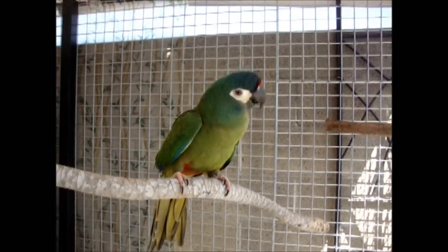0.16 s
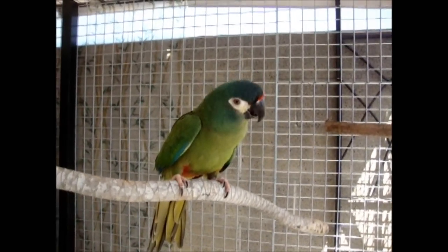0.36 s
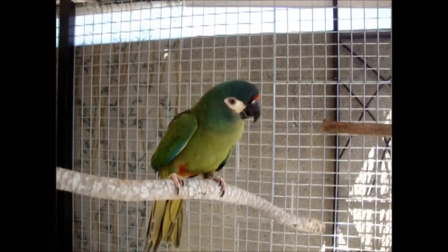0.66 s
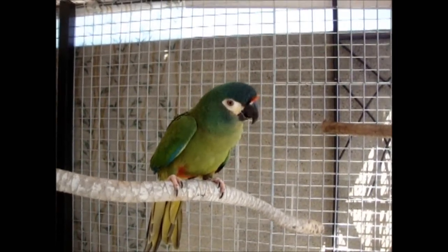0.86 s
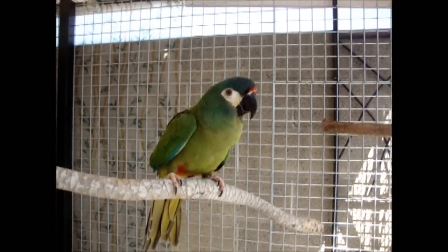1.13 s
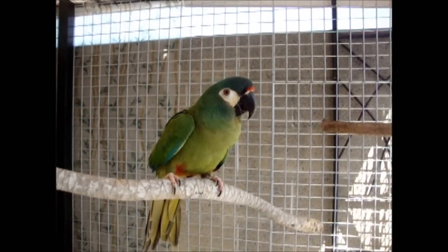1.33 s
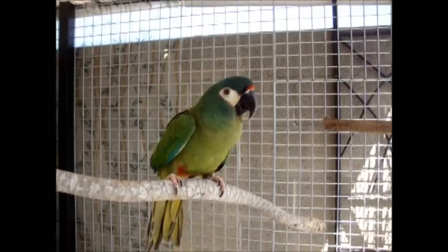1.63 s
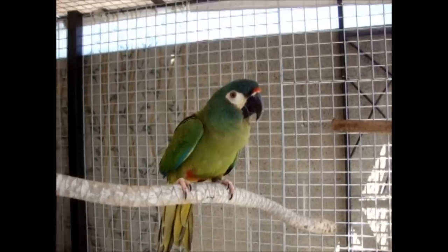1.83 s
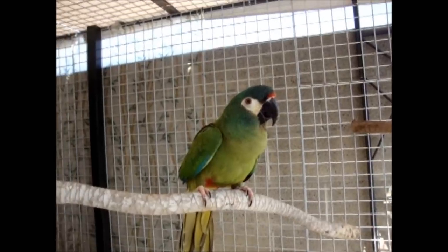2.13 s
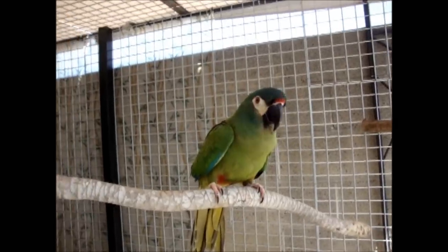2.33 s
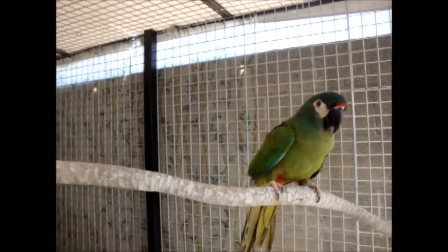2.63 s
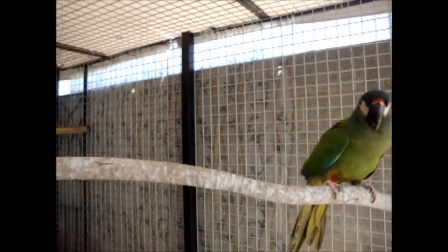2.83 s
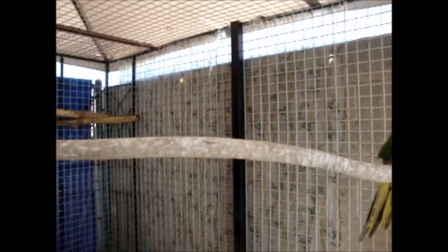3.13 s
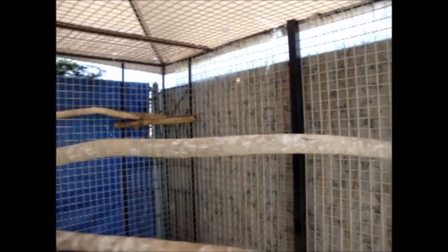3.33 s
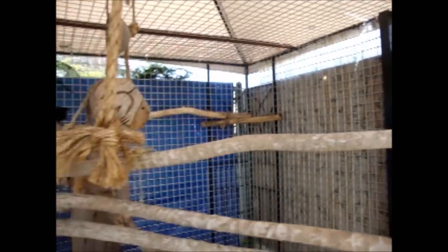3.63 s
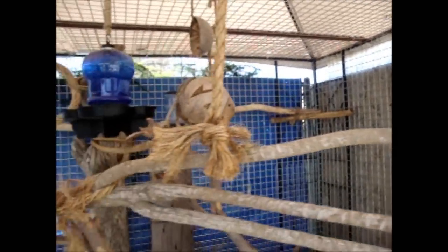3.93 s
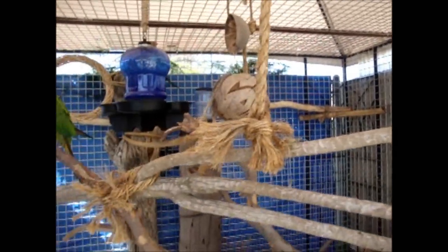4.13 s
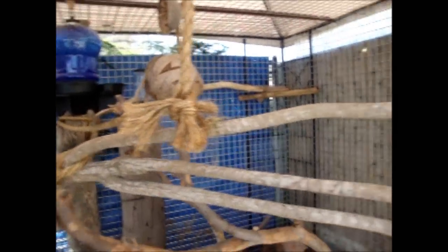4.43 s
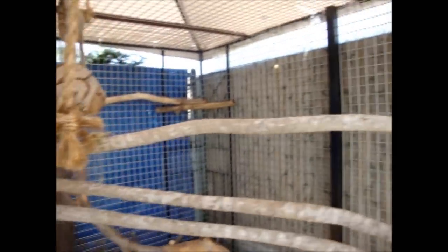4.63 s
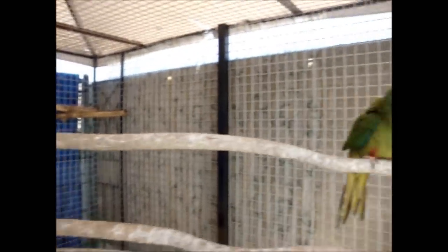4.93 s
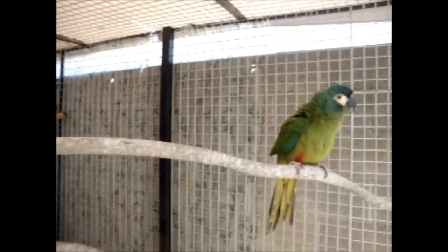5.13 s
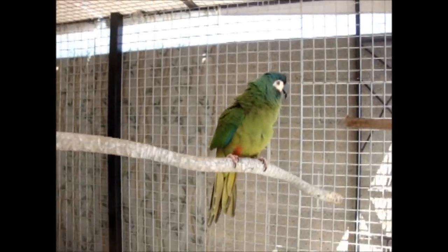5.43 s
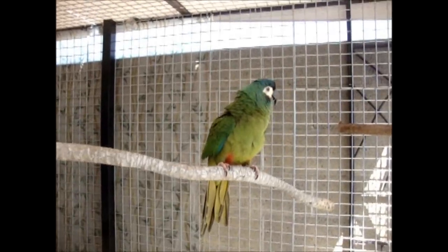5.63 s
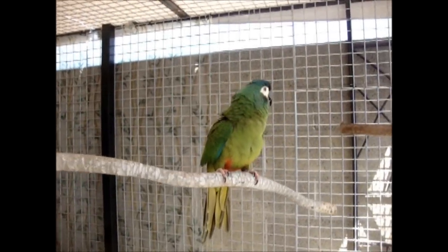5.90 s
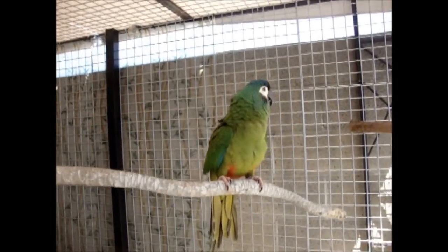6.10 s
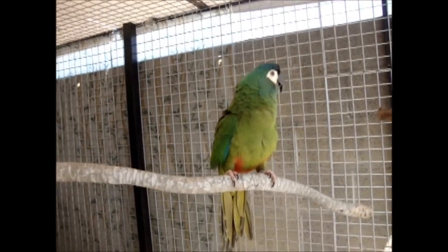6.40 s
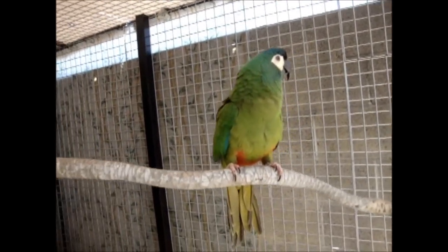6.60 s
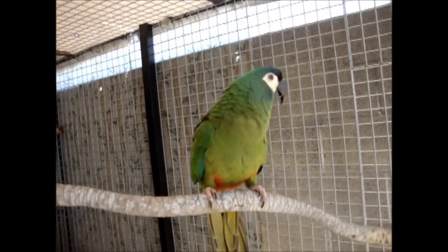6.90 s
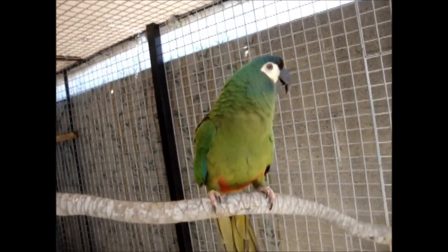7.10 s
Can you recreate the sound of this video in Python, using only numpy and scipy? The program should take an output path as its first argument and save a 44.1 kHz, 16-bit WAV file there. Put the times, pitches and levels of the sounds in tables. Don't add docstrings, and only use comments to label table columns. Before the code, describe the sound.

Faint outdoor hiss and distant traffic with tiny bird chirps; a quick wing flutter, one loud harsh parrot screech, then a shorter double squawk.

```python
import sys
import numpy as np
from scipy import signal
from scipy.fft import rfft, irfft, next_fast_len
from scipy.io import wavfile
from scipy.ndimage import uniform_filter1d, map_coordinates

SR = 44100
rng = np.random.default_rng(int(sys.argv[2]) if len(sys.argv) > 2 else 0)


def boost(x):
    u = np.asarray(x, float) / 20
    return 10 ** u


def unload_wav(signal):
    wavfile.write(
        sys.argv[1],
        SR,
        np.round(np.clip(np.atleast_2d(signal).T, -1, 1) * 32767).astype(np.int16),
    )


N = 319989
T = np.arange(N) / SR

# (time [s], level [dB])
TRAFFIC_SWELL = [(0, 0), (1.2, 0.6), (2.0, -0.1), (3.8, -0.86), (4.3, -0.7), (4.8, .5), (5.4, 0), (5.9, .5),
                 (7.26, 0.3)]
# (frequency [Hz], level [dB])
RUMBLE_SPECTRUM = [(12, -50.5), (20, -24.5), (70, -10), (97, -8), (136, 0.5), (268, -6), (300, -10),
                   (390, -22.5), (660, -120)]
TRAFFIC_SPECTRUM = [(150, -33.5), (250, -7), (400, -3.5), (600, -1.5), (850, -1.06), (1350, -9.5),
                    (1900, -20), (3000, -30.5), (5500, -120)]
# (time [s], length [s], pitch [Hz], level [dB], trill depth [Hz])
FAR_CHIRPS = [(0.076, 0.065, 3320, -47, 400), (0.083, 0.036, 4070, -51, 200),
              (0.172, 0.12, 3230, -58.5, 350), (0.849, 0.05, 3380, -56, 500), (0.853, 0.1, 2720, -59, 74),
              (1.56, 0.068, 3140, -51, 360), (1.686, 0.31, 3160, -61, 35), (2.719, 0.081, 3360, -53, 450),
              (2.77, .025, 3930, -55, 30), (3.455, 0.076, 3250, -56, 650), (4.403, .069, 3060, -53, 180),
              (4.503, .14, 3050, -65, 120), (5.798, 0.14, 1415, -52, 8), (5.993, 0.06, 2200, -63, 22),
              (6.505, 0.16, 3330, -52, 610), (6.53, 0.046, 3620, -59, 25), (6.551, 0.05, 3900, -55, 25)]
# (time [s], length [s], first pitch [Hz], last pitch [Hz], level [dB])
FALLING_CHIRPS = [
    (0.033, 0.0636, 4130, 3500, -53.5),
    (1.504, 0.032, 3980, 2870, -53),
]
# (frequency [Hz], reverberation time T60 [s])
YARD_DECAY = [(300, 0.86), (1500, 0.44), (2350, 0.5), (2900, 0.42), (3400, 0.65), (4200, 0.33),
              (9000, 0.42)]
# (time [s], clap level [dB])
DOWNSTROKES = [
    (1.912, -47.5),
    (1.954, -42),
    (2.003, -38.5),
    (2.043, -38.5),
    (2.085, -40.5),
    (2.131, -47),
]
# (frequency [Hz], level [dB])
CLAP_SPECTRUM = [(150, -27), (400, -2.5), (1000, 0), (2000, -4), (4500, -5.5), (9000, -11), (12000, -59)]
FEATHER_SPECTRUM = [(300, -48), (1000, -6), (3000, -6.5), (6000, -5), (9000, -11), (10200, -10.5),
                    (12000, -62)]
# (time [s], effort [dB], pitch [Hz], beak resonance [Hz], roughness [0-1])
NEAR_SCREECH = [
    (2.152, -33, 542, 1805, .05),
    (2.192, -18.5, 529.5, 2005, 0.4),
    (2.25, -12.5, 806.4, 2370, 0.46),
    (2.28, -16.5, 916.4, 2260, .3),
    (2.335, -11.5, 926, 2140, .1),
    (2.366, -14, 1191, 2330, 0.33),
    (2.412, -11, 692, 2420, .5),
    (2.43, -25, 571, 2370, 0),
    (2.45, -32.5, 459, 2360, 0.2),
]
SIDE_YELP_CALL = [
    (3.822, -35.5, 606.7, 1390, .26),
    (3.838, -38, 599.6, 1450, 0.33),
    (3.852, -33.5, 863.4, 1520, 0.65),
    (3.866, -22.5, 966.8, 1890, .3),
    (3.889, -23.5, 679, 1960, .4),
    (3.901, -13, 658.5, 2070, .15),
    (3.912, -17, 671.4, 2030, .3),
    (3.935, -32.5, 557, 1950, 0.51),
]
SIDE_CAW_CALL = [
    (3.95, -25.5, 443.3, 1530, .45),
    (3.98, -20, 574, 1410, 0.41),
    (4.012, -24.5, 658.7, 1420, .3),
    (4.025, -21, 701.8, 1420, .25),
    (4.04, -22.5, 749.2, 1410, 0.3),
    (4.086, -26.5, 582.7, 1460, 0.47),
    (4.114, -39, 431, 1240, .5),
    (4.13, -42, 330, 1100, .55),
]
# (frequency [Hz], width [Hz], level [dB])
NEAR_WINDPIPE = [(3240, 360, -0.5), (4374, 330, 0.5), (5150, 510, -4), (6140, 1300, -8.5), (7210, 360, -4),
                 (9790, 875, -23)]
SIDE_WINDPIPE = [(2610, 670, -11.5), (3500, 480, -1.5), (4204, 230, 3.5), (4820, 420, -0.5),
                 (6060, 1300, -12.5), (8000, 1100, -13.5), (10000, 900, -31)]
# (time of burst [s], depth [dB], length [s])
VOICE_CATCHES = [
    (2.173, -24, .011),
    (2.19, -14, .013),
    (2.212, -9, .012),
    (2.232, -4, .01),
    (2.387, -4, .008),
    (3.847, -6, .008),
    (3.898, -5, .008),
]
# (delay [s], level [dB])
PANEL_REFLECTIONS = [(.0029, -16.5), (.0064, -18), (.0113, -10.5), (.0172, -8), (.0239, -14.5)]
# (time [s], peak level [dB], ring frequency [Hz], share of crack [ratio])
CLAW_TICKS = [
    (4.41, -45, 1910, 0.33),
    (4.455, -45, 1940, .3),
    (4.527, -48, 1940, .3),
    (4.585, -50, 2000, .3),
    (6.706, -29, 1930, 0.14),
    (6.789, -50, 2100, 0.82),
    (6.958, -53, 2100, .9),
    (7.088, -50, 2840, .87),
    (7.094, -44.5, 2860, 0.84),
    (7.121, -46.5, 1740, 1),
]
# (frequency [Hz], level [dB])
HISS_SPECTRUM = [(500, -33.5), (1500, -4.5), (3000, -5), (6200, -8), (9500, -10), (10200, -11),
                 (12800, -40.5), (21700, -120)]


def unit(x):
    return x / np.sqrt(np.mean(x ** 2) + 1e-20)


def along(points, hz):
    f, v = np.transpose(points)
    return np.interp(np.log(hz + 1), np.log(f + 1), v)


def drift(clock, count=1):
    knots = rng.standard_normal((count, int(clock[-1]) + 4))
    return np.array([map_coordinates(k, [clock]) for k in knots])


def rush(spectrum, patchy_db):
    z = signal.stft(rng.standard_normal(N + 512), nperseg=512)[2]
    field = uniform_filter1d(rng.standard_normal(z.shape), 5, 0)
    field = uniform_filter1d(field, 12, 1)
    x = signal.istft(z * boost(patchy_db * unit(field)), nperseg=512)[1]
    m = next_fast_len(N + 8192)
    gain = boost(along(spectrum, np.fft.rfftfreq(m, 1 / SR)))
    return unit(irfft(rfft(x, m) * gain, m)[:N])


def echoes(x, delay_s):
    hz, t, z = signal.stft(rng.standard_normal(SR // 2), SR, nperseg=256)
    decay_db = -60 * t / along(YARD_DECAY, hz)[:, None]
    tail = signal.istft(z * boost(decay_db), SR, nperseg=256)[1]
    tail = np.pad(tail, (int(delay_s * SR), 0))
    return signal.fftconvolve(x, tail / np.linalg.norm(tail))[:N]


def background():
    swell_db = np.interp(T, *np.transpose(TRAFFIC_SWELL))
    rumble_db = -60 + 3.2 * swell_db + 2.2 * drift(T * 5)[0]
    traffic_db = -49.5 + swell_db + 0.5 * drift(T * 6)[0]
    rumble = boost(rumble_db) * rush(RUMBLE_SPECTRUM, patchy_db=0.1)
    return rumble + boost(traffic_db) * rush(TRAFFIC_SPECTRUM, patchy_db=1.08)


def far_birds():
    sag_per_s, trill_rate_hz, sweep_trill_hz = 0.086, 47, 220
    notes = [(s, length_s, hz, hz * (1 - sag_per_s * length_s), db, trill_hz)
             for s, length_s, hz, db, trill_hz in FAR_CHIRPS]
    notes += [(*row, sweep_trill_hz) for row in FALLING_CHIRPS]
    out = np.zeros(N + SR)
    for s, length_s, first_hz, last_hz, db, trill_hz in notes:
        t = np.arange(int(length_s * SR)) / SR
        trill = signal.sawtooth(2 * np.pi * trill_rate_hz * t + 6.3 * rng.random(), 0.3)
        hz = first_hz + (last_hz - first_hz) * t / length_s + trill_hz * trill
        whistle = np.sin(2 * np.pi * np.cumsum(hz) / SR) * signal.windows.tukey(len(t), 0.4)
        out[int(s * SR):][:len(t)] += boost(db + 2.5) * whistle
    return 0.51 * out[:N] + 0.58 * echoes(out[:N], 0.006)


def wing():
    clap_s = 0.0095
    swish_db, swish_from_s, swish_hold_s, swish_stop_s = -43, 1.935, 0.11, 2.145
    edge_db_per_s, fall_db_per_s = 1500, 139
    claps = sum(boost(db) * np.exp(-0.5 * ((T - s) / clap_s) ** 2) for s, db in DOWNSTROKES)
    outside_s = np.maximum(np.maximum(swish_from_s - T, T - swish_stop_s), 0)
    falling_s = np.maximum(T - swish_from_s - swish_hold_s, 0)
    swish = boost(swish_db - edge_db_per_s * outside_s - fall_db_per_s * falling_s)
    crackle = boost(1.9 * drift(T * 400)[0])
    clap_noise = claps * rush(CLAP_SPECTRUM, patchy_db=2.0)
    return crackle * (clap_noise + swish * rush(FEATHER_SPECTRUM, patchy_db=2.5))


def windpipe(source, modes):
    m = next_fast_len(len(source) + 4096)
    f = np.fft.rfftfreq(m, 1 / SR)
    response = 0
    for i, (hz, width_hz, db) in enumerate(modes):
        damping = 1j * f * width_hz
        response = response + (-1) ** i * boost(db) * damping / (hz * hz - f * f + damping)
    return unit(irfft(rfft(source, m) * response, m)[:len(source)])


def screech(rows, throat, opens_s, width, chest_db, pipe_db, jitter, shimmer_db, waver_db):
    s, *cols = np.transpose(rows)
    span = slice(int(s[0] * SR), int(s[-1] * SR))
    t = T[span]
    effort_db, hz, beak_hz, rough = [np.interp(t, s, c) for c in cols]

    low_db = chest_db + 0.52 * (effort_db + 15) + 13 * np.log2(hz / 930)
    low_db = low_db + 2 * drift((t - t[0]) * 90)[0]
    pipe_db = np.linspace(*pipe_db, len(t)) + 0.38 * np.minimum(effort_db + 22.5, 0)
    pipe_db = pipe_db - 17 * np.clip((opens_s - t) / 0.003, 0, 1)

    cycles = np.cumsum(hz) / SR
    turns = cycles + jitter * drift(cycles / 3)[0]
    k = np.arange(1, 31)[:, None]
    clear = (1 - np.clip(rough, 0, 0.95)) ** np.minimum(0.8 * k - 0.55, 2.5)
    scramble = drift(0.75 * cycles, count=30) + 1j * drift(0.75 * cycles, count=30)
    scramble = scramble / np.sqrt(2)
    waver = boost(waver_db * drift(cycles / 7, count=30) * np.minimum(k / 2, 1))
    waver = waver / boost(waver_db ** 2 / 12)
    swing = np.sqrt(clear) * waver + np.sqrt(1 - clear) * scramble
    tones = np.sqrt(2) * np.real(swing * np.exp(2j * np.pi * k * turns)) * (k * hz < 10500)

    width_hz = hz * np.linspace(*width, len(t))
    mouth = (k > 1) / (1 + (2 * (k * hz - beak_hz) / width_hz) ** 2)
    voice = np.sum(mouth * tones, 0) / np.sqrt(np.sum(mouth ** 2, 0))
    pipe = windpipe(np.sum(tones, 0) * np.sqrt(hz), throat)
    upper = voice + boost(pipe_db + 2.5 * drift(cycles / 3)[0]) * pipe
    upper = upper * boost(shimmer_db * drift(cycles / 4)[0])

    catch_db = sum(db * np.clip(1 - (at - t) / size_s, 0, 1) * (t < at) for at, db, size_s in VOICE_CATCHES)
    call = boost(effort_db) * upper + boost(low_db) * tones[0]
    out = np.zeros(N)
    out[span] = call * boost(catch_db) * signal.windows.tukey(len(t), 0.01)
    return signal.sosfilt(signal.butter(3, 340, "high", fs=SR, output="sos"), out)


def walls(x):
    copies = sum(boost(db) * np.roll(x, int(s * SR)) * (-1) ** k for k, (s, db) in enumerate(PANEL_REFLECTIONS))
    return x + uniform_filter1d(copies, size=3)


def parrots():
    near = screech(NEAR_SCREECH, NEAR_WINDPIPE, opens_s=2.173, width=(1.5, 0.6), chest_db=-25,
                   pipe_db=(-14, -12), jitter=0.037, shimmer_db=1.4, waver_db=4)
    side = screech(SIDE_YELP_CALL + SIDE_CAW_CALL, SIDE_WINDPIPE, opens_s=3.85, width=(2.9, 1.1), chest_db=-19,
                   pipe_db=(-7, -11.5), jitter=0.02, shimmer_db=2.1, waver_db=3)
    reverberant = boost(-14.5) * echoes(near, 0.02) + boost(-16) * echoes(side, 0.02)
    return boost(-0.5) * walls(near + side) + reverberant


def claws():
    ring_t60_s, crack_t60_s, attack_s = 0.027, 0.024, 0.00026
    out, t = np.zeros(N + SR), np.arange(SR // 10) / SR
    edge = signal.butter(3, [2200, 5000], "band", fs=SR, output="sos")
    for s, db, hz, crack_share in CLAW_TICKS:
        ring = np.sin(2 * np.pi * hz * t) * boost(-60 * t / ring_t60_s) * (1 - np.exp(-t / attack_s))
        crack = unit(signal.sosfilt(edge, rng.standard_normal(len(t))))
        crack = crack * boost(-60 * t / crack_t60_s)
        out[int(s * SR):][:len(t)] += boost(db) * (ring + crack_share * crack)
    return out[:N]


def scene():
    return (background() + far_birds() + wing() + parrots() + claws())[None]


def ducked(x):
    threshold_db, slope, release_db_per_s, bass_hz = -19, 1.4, 5, 742
    power = np.abs(uniform_filter1d(x ** 2, size=8000))
    over_db = 10 * np.log10(power + 1e-12) - threshold_db
    release_db = release_db_per_s * T
    held_db = np.maximum.accumulate(over_db + release_db, axis=-1) - release_db
    bass = signal.sosfilt(signal.butter(1, bass_hz, fs=SR, output="sos"), x)
    return x - (1 - boost(-slope * np.maximum(held_db, 0))) * bass


def roll_off(x):
    return signal.sosfilt(signal.butter(12, 10030, fs=SR, output="sos"), x)


def record(dry):
    x = ducked(dry)
    x = x / (1 + np.abs(x / 0.85) ** 4) ** (1 / 4)
    x = x + 0.1 * np.abs(x) ** 3
    x = x + boost(-58) * rush(HISS_SPECTRUM, patchy_db=1.23)
    x = signal.sosfilt(signal.butter(1, 25, "high", fs=SR, output="sos"), x)
    x = signal.sosfiltfilt(signal.ellip(10, 0.1, 80, 10050, fs=SR, output="sos"), x)
    return roll_off(x)


dry = scene()
out = record(dry)
unload_wav(out)
```